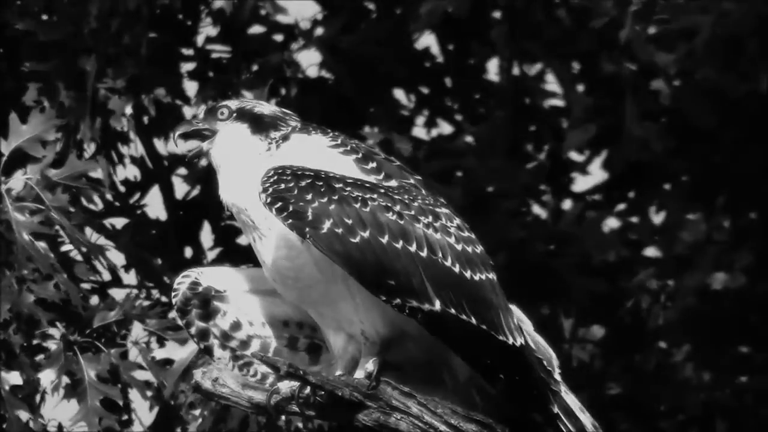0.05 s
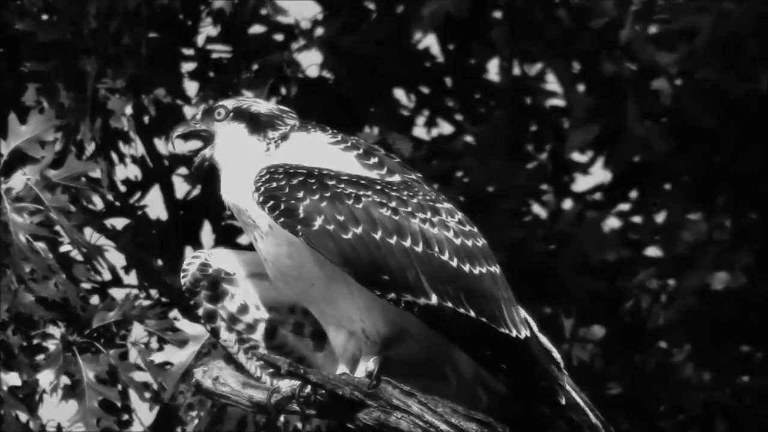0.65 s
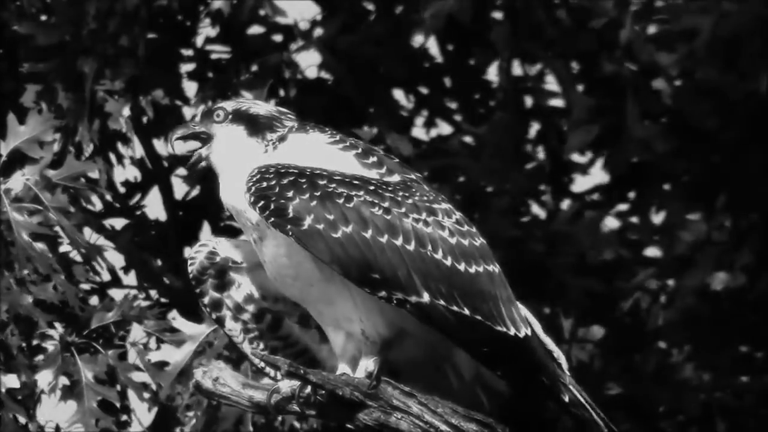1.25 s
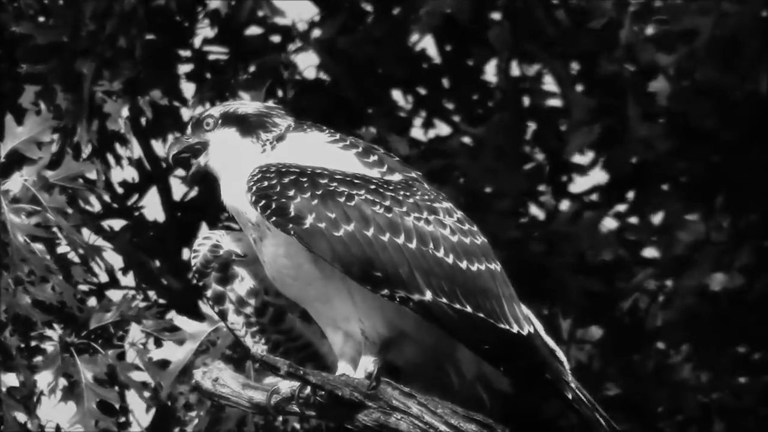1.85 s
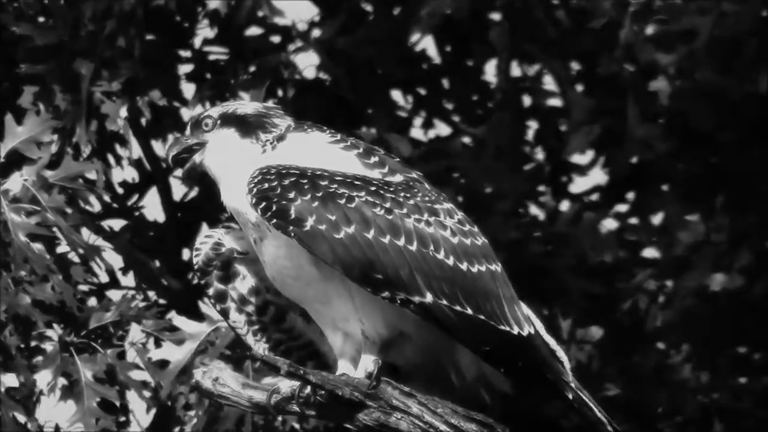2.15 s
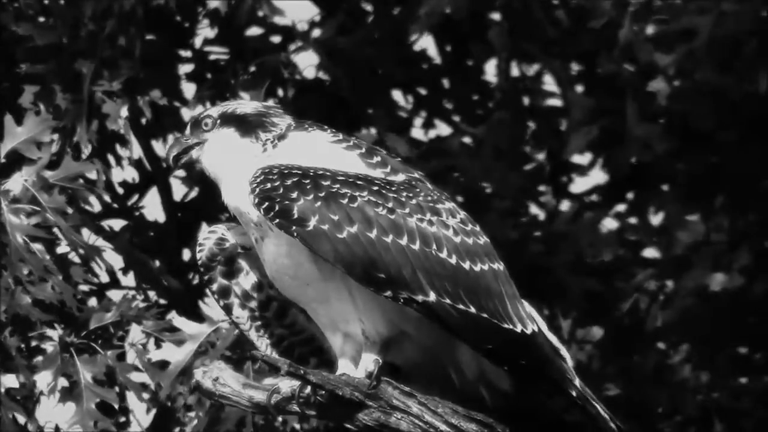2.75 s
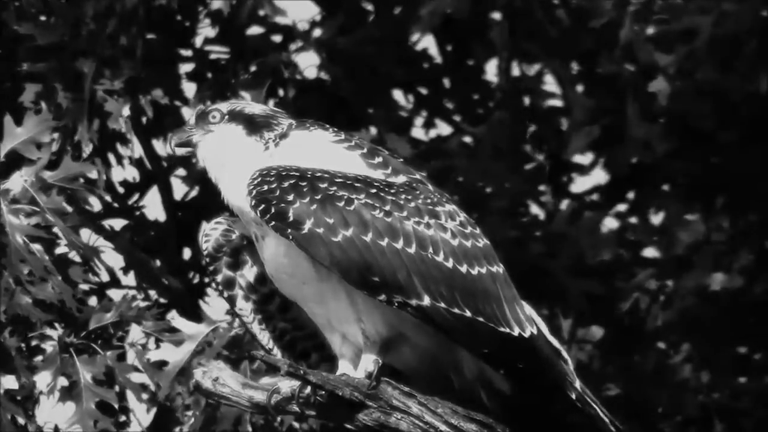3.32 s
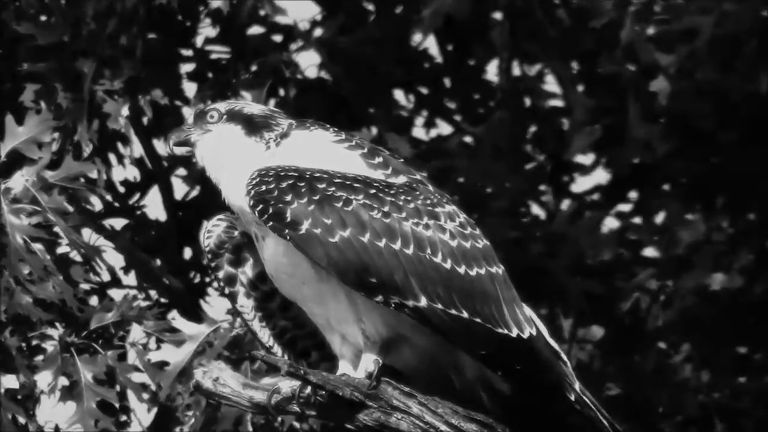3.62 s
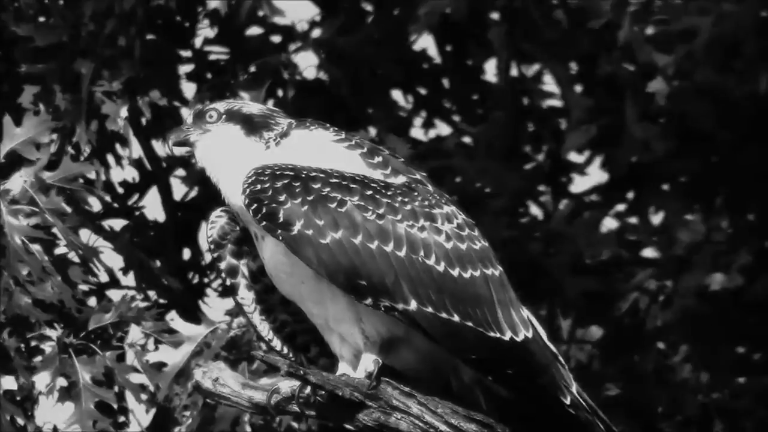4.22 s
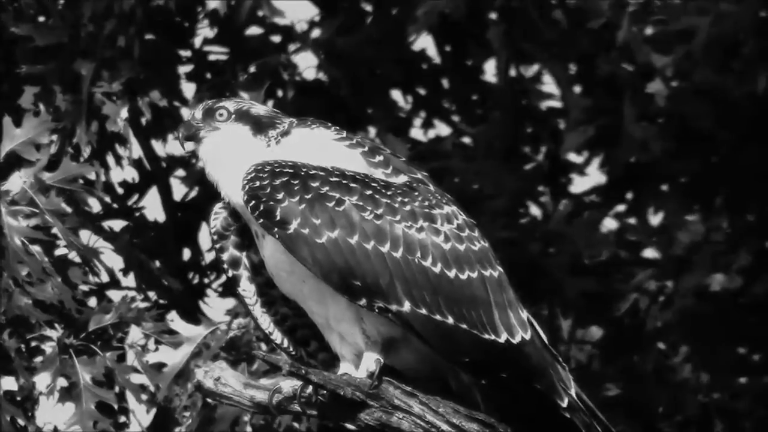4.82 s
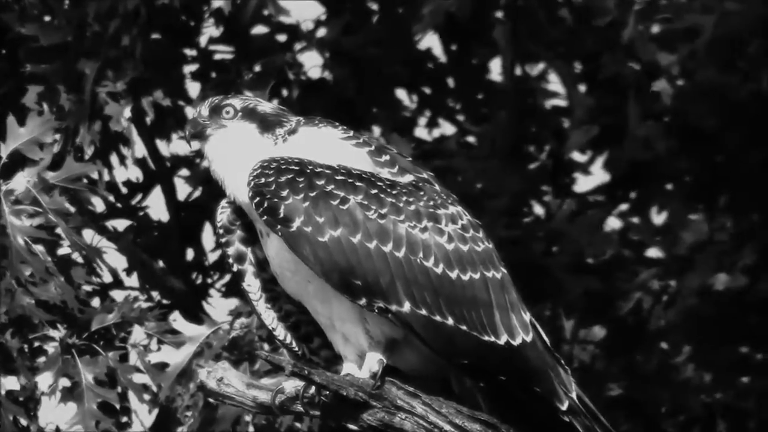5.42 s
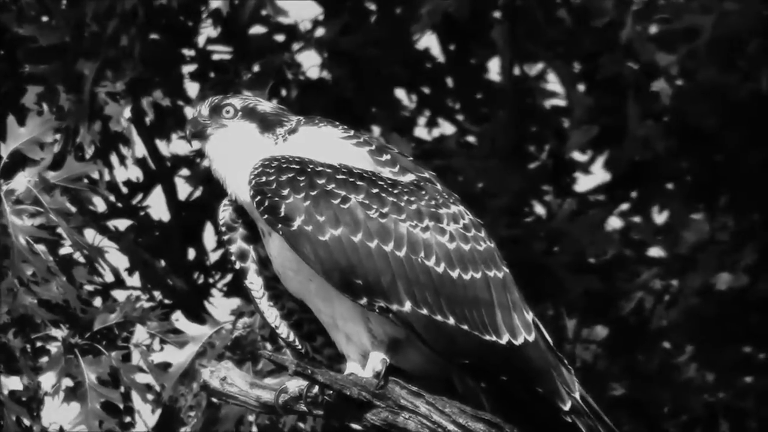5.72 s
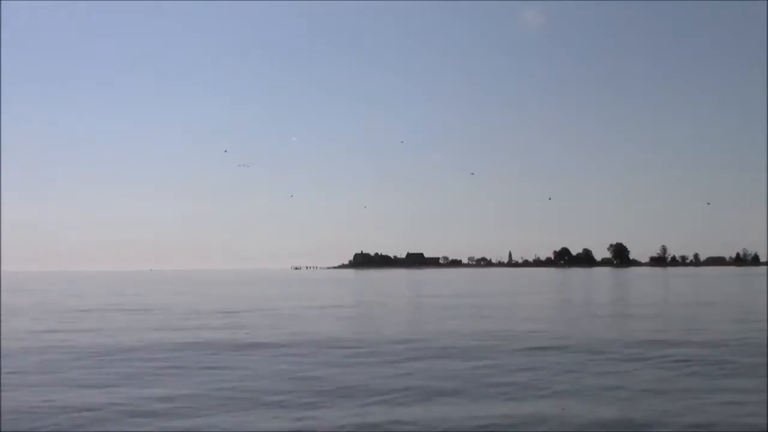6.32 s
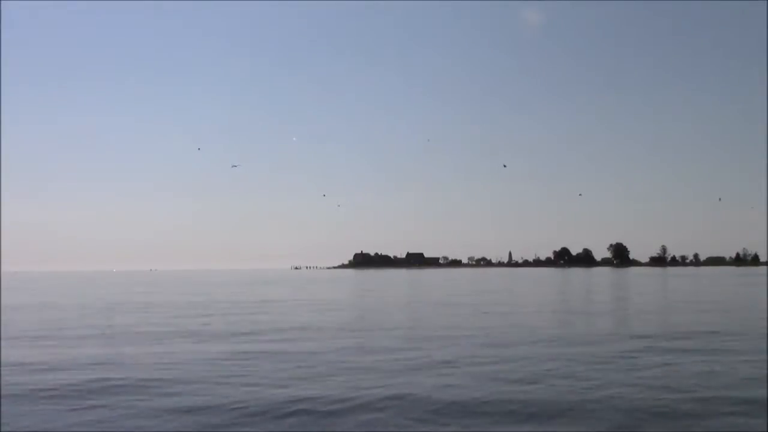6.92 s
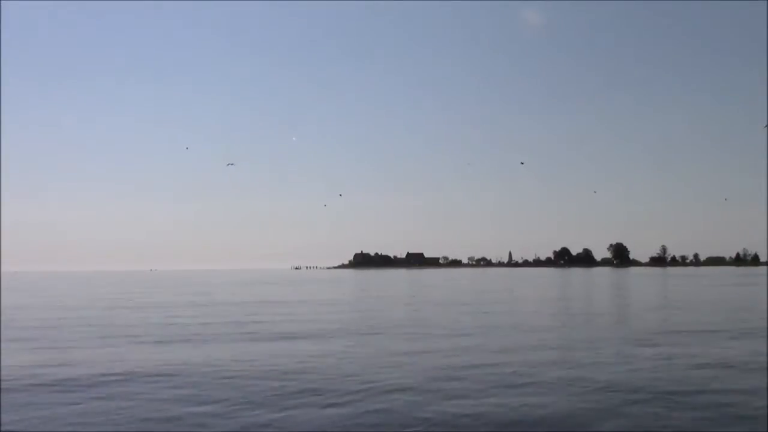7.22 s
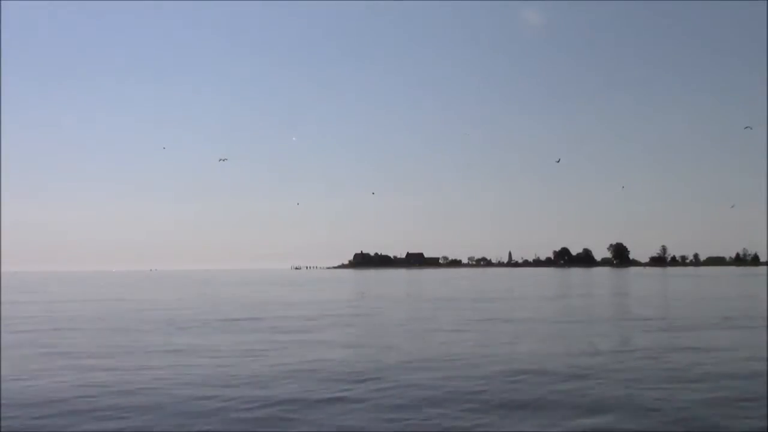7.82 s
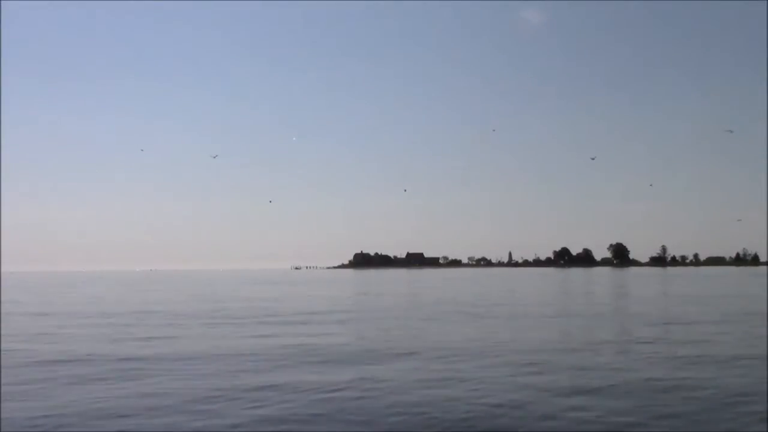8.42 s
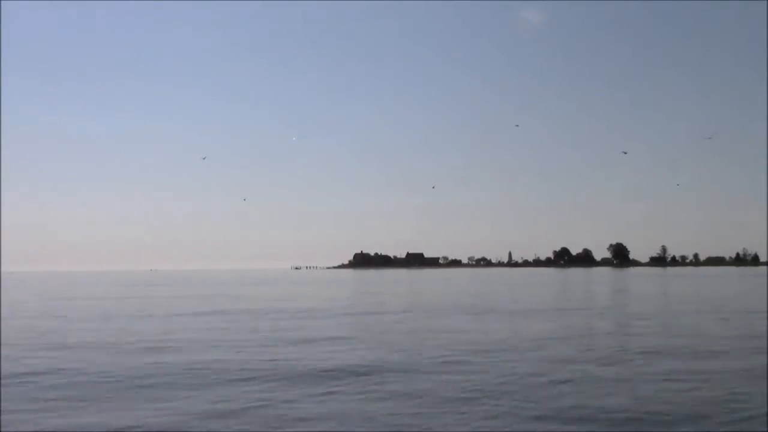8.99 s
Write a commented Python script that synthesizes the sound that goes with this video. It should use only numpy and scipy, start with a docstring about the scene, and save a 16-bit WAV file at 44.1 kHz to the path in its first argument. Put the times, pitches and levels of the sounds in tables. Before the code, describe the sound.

A bird of prey calls near the microphone in a quick string of piercing, slightly raspy whistles, while a camera fires two rapid bursts of shutter clicks. When the calls stop, only thin insect buzz, rustling leaves and small dry ticks remain. A sharp knock then cuts from the woods to a quiet shore, where little waves lap and plop, a distant bird whistles twice and a boat engine hums very faintly.

```python
"""Osprey, camera shutter and open water

An osprey gives a run of arched whistles, a clear voice and a cracked one sharing its syrinx, while
a camera shutter clatters through two bursts. Insects buzz, leaves stir and twigs tick. On a knock
at six seconds the wood gives way to calm open water: small waves slap, bubbles ring as they form,
a far boat drones and a far bird whistles."""
import sys
import numpy as np
from scipy import signal
from scipy.fft import rfft, irfft
from scipy.io import wavfile

SR = 44100
rng = np.random.default_rng(int(sys.argv[2]) if len(sys.argv) > 2 else 0)


def output_pcm(signal):
    """Save a mono or channel-first signal as 16-bit PCM at the path in sys.argv[1].

    Samples are clipped to [-1, 1] before scaling.
    """
    pcm = np.clip(np.atleast_2d(signal).T, -1, 1) * 32767
    wavfile.write(sys.argv[1], SR, np.round(pcm).astype(np.int16))


N = 403515
TIME = np.arange(N) / SR
FREQS = np.maximum(np.arange(N // 2 + 1) * SR / N, 1)
WATER_FROM_S = 6.015

# The osprey's calls. Each row: start and end in seconds, crest pitch in Hz, level in dB, then in dB
# against that level: octave, low voice at the ends, low voice held, rattle, half-order tones.
OSPREY_CALLS = [(-0.035, 0.047, 3215, -26, -14, -6.5, -21, -18.5, -43),
                (0.174, 0.367, 3199, -26.5, -14, -8, -21.5, -20.5, -43),
                (0.503, 0.584, 3164, -30, -8.5, -2.5, -18.5, -19, -36),
                (0.691, 0.859, 3177, -26.5, -9, -11.5, -20.5, -22.5, -38),
                (0.987, 1.067, 3162, -27.5, -6.5, -6.5, -21, -28, -31),
                (1.174, 1.33, 3202, -24, -10.5, -10, -22, -30, -45),
                (1.463, 1.539, 3137, -30.5, -6, -3, -25.5, -20.5, -32),
                (1.663, 1.744, 3117, -30, -11.5, -9.5, -26, -23, -25.5),
                (1.857, 1.946, 3128, -28.5, -9, -11, -25, -23, -30),
                (2.041, 2.179, 3164, -25.5, -10, -10, -23, -33, -40),
                (2.284, 2.365, 3139, -26.5, -10, -6.5, -28, -29, -29),
                (2.482, 2.562, 3048, -30, -6, -16, -28, -24, -30),
                (2.66, 2.75, 3073, -28.5, -11.5, -6.5, -24, -26, -29),
                (2.895, 2.984, 2988, -33, -6, -20, -27, -20, -32)]
# Lower calls droop further at both ends. Each row: crest pitch in Hz, droop in Hz.
CALL_DROOP = [(3110, 220), (3200, 100.4)]
# Air rushing through the throat. Each row: frequency in Hz, relative level in dB.
THROAT_AIR = [(1500, -25.5), (2200, -4), (2600, 2.5), (3000, 5), (3500, -5.5), (4100, -6.5), (4700, -14),
              (5600, -15), (6500, -6.5), (7900, -8), (9500, -24), (13000, -29.5), (16000, -53)]
# Echoes off trunk and canopy. Each row: delay in seconds, level in dB, left over right in dB.
TREE_ECHOES = [(.0052, -19, 4), (0.019, -14.5, 6), (.036, -13, -4.5), (.071, -23, -2), (.098, -20, -4)]
# The insect chorus. Each row: pitch in Hz, bandwidth in Hz, pulses per second, fall within a pulse
# in Hz, level in dB, stop time in seconds.
INSECT_VOICES = [(6868, 120, 43, 200, -57, 6.01), (6430, 440, 36, 320, -58, 6.01),
                 (5290, 480, 36, 340, -63.5, 6.01), (7410, 220, 32, 160, -69.5, 6.01),
                 (5140, 260, 61, 550, -53.5, 0.595)]
# The far murmur of the wood. Each row: frequency in Hz, relative level in dB.
WOOD_MURMUR = [(18, -48), (30, -18.5), (97, -20), (135, -8), (434, -5), (632, -5.5), (864, -3.5),
               (1040, -3.5), (1280, -4.5), (2610, -14.5), (4400, -27), (5720, -25), (8000, -26),
               (10500, -22.5), (16000, -36.5)]
# The colour of rustling leaves. Each row: frequency in Hz, relative level in dB.
LEAF_RUSTLE = [(250, -32), (550, 4), (1500, -3), (3000, 0), (5000, -3), (9000, -12), (12000, -24),
               (16000, -25.5)]
# The breeze in the leaves. Each row: time in seconds, level of their treble in dB.
BREEZE_LEVEL = [(3.3, -81), (3.58, -84), (4.56, -75.5), (5.18, -77), (5.65, -73), (6.0, -82.5)]
# Stereo width of the noise beds. Each row: frequency in Hz, left-right correlation.
EAR_LIKENESS = [(30, .1), (80, 0.18), (200, 0.42), (1000, 0.049), (3000, 0.2), (7000, 0.11), (14000, 0.11)]
# Shutter bursts. Each row: start in seconds, number of frames.
SHUTTER_BURSTS = [(.5923, 3), (2.6047, 4)]
# Mirror and blades landing in one release. Each row: delay in seconds, snap in dB, snap decay in
# seconds, frame ring in dB, body thud in dB.
SHUTTER_CONTACTS = [(.0015, -33.5, 0.0024, -31, -52), (0.0129, -25.5, 0.0022, -32, -33),
                    (0.0226, -32.5, 0.006, -43, -67), (0.026, -52, 0.0024, -30, -29),
                    (0.0465, -25, 0.0034, -28, -30), (.0525, -43, 0.0023, -42, -33),
                    (.069, -36.5, 0.0058, -23.5, -37), (.083, -26.5, 0.0017, -44, -33.5),
                    (.087, -34, 0.0057, -49, -38.5), (.1, -50, 0.0013, -27, -42)]
# The snap of a contact. Each row: frequency in Hz, relative level in dB.
CONTACT_SNAP = [(250, -37), (500, 6), (900, -14), (1500, 4.5), (2500, 3), (4000, 0.5), (7000, 0),
                (8500, -5), (11000, -8.5), (13000, -23), (16000, -29)]
# The ring of the camera's frame. Each row: pitch in Hz, level in dB, seconds to fall 60 dB.
FRAME_RING = [(1363, -10.5, 0.032), (1623, -9, 0.017), (1794, -9.5, 0.036), (1960, -6.5, 0.012),
              (2150, -6, 0.018)]
# The thud of the camera's body. Each row: pitch in Hz, level in dB, seconds to fall 60 dB.
BODY_THUD = [(396, -9, 0.011), (510, -4.5, 0.055), (562, -8, 0.022), (671, -15, 0.064), (890, -18, 0.058),
             (1050, -16, 0.025)]
# The winding motor. Each row: frequency in Hz, relative level in dB.
MOTOR_WHIRR = [(300, -28), (520, -1.5), (900, -3.5), (1400, -4), (2100, 1.5), (2700, -12.5),
               (7000, -13), (12000, -25), (16000, -42)]
# Twig ticks and camera knocks. Each row: time in seconds, level in dB, pitch in Hz, treble trim in dB,
# decay in seconds.
DRY_TICKS = [(3.8786, -39.5, 2020, 0, 0.0022), (4.0274, -28.5, 2900, -30, 0.00085),
             (4.047, -42, 3300, -20, 0.00092), (4.272, -46, 2880, -35, .002),
             (4.3505, -33, 1620, -39, 0.0012), (4.4966, -23, 1880, -22, .0005),
             (4.4985, -32, 2030, -25, 0.00099), (4.5117, -23, 4340, -25, 0.00077),
             (4.6485, -42.5, 2780, -30, 0.0017), (4.7398, -35.5, 2680, -28, 0.00094),
             (4.7852, -42.5, 1700, -14, 0.0012), (5.2697, -38, 3680, -14, 0.0014),
             (5.726, -35, 5660, -1, 0.0015), (5.9305, -41.5, 2850, -5, 0.0025),
             (5.9395, -49, 2930, 7, 0.011), (6.005, -24, 2680, -24, 0.0022),
             (6.0082, -25, 3000, -25, 0.0027), (6.0105, -28, 1510, -32, 0.0024),
             (6.0148, -23.5, 2400, -14, .003), (6.019, -26.5, 2280, -30, 0.0023)]
# Where the ticks sit. Each row: time in seconds, bearing from -1 (right) to 1 (left).
TICK_PATH = [(3.9, 0), (4.35, .65), (4.52, .65), (4.7, 0), (5.95, 0), (6.0, -1)]
# The noise in a crack and in a tap. Each row: frequency in Hz, relative level in dB.
CRACK_SPLINTER = [(250, -35), (600, -12.5), (1500, -7), (4200, -3.5), (7000, -20), (16000, -50)]
CRACK_TREBLE = [(2500, -5), (8000, -3), (12000, -16), (16000, -30)]
TAP_SKIRT = [(200, -40), (500, -17), (1500, -1), (4500, -5), (7000, -58), (16000, -52)]
TAP_TREBLE = [(2500, -2), (5000, -3), (8000, -7), (12000, -23), (16000, -32)]
# Soft handling bumps. Each row: time in seconds, level in dB, pitch in Hz.
HANDLING_BUMPS = [(3.882, -40.5, 570), (4.496, -36.5, 575), (4.514, -49, 594), (4.765, -36.5, 444),
                  (4.783, -41, 496), (4.819, -37.5, 630), (5.369, -40, 730)]
# The wash of small waves. Each row: frequency in Hz, relative level in dB.
WAVE_WASH = [(18, -54), (30, -34), (96, -29), (164, -4.5), (291, -5), (357, -1.5), (476, -4), (916, -2.5),
             (1250, -9), (1560, -9), (4000, -24), (5200, -58), (8800, -120)]
# Their fine spray. Each row: frequency in Hz, relative level in dB.
WAVE_SPRAY = [(1500, -4), (3000, -0.5), (6000, -6), (8000, -8.5), (10500, -15), (13000, -19), (16000, -26)]
# The tones of the boat's engine. Each row: pitch in Hz, relative level in dB.
ENGINE_TONES = [(172.3, -81.5), (188.4, -83.5), (253.0, -73), (274.5, -76), (317.6, -71.5), (339.1, -67),
                (376.8, -73)]
# The swell of its drone. Each row: time in seconds, level in dB.
ENGINE_LEVEL = [(6.25, -70.5), (7.15, -65), (7.4, -59.5), (8.45, -59), (9.15, -66)]
# Bubbles ringing as they form, and near 8.86 s the three short rings of one wave slap. Each row: time in
# seconds, level in dB, pitch in Hz, decay in seconds, # rise in octaves per second.
BUBBLES_AND_SLAP = [(6.068, -44, 1480, 0.0056, 16), (7.679, -50, 1080, .008, -5), (7.693, -45, 1960, 0.0051, 70),
                    (7.729, -51, 1680, .005, 15), (7.741, -51, 1780, .005, 6), (7.763, -48, 1540, 0.0046, 18),
                    (7.771, -46, 1800, 0.0097, 4), (8.536, -51.5, 1570, 0.0072, 3), (8.618, -52, 1740, 0.0036, 13),
                    (8.732, -47, 1470, .005, 11), (8.743, -46.5, 713, 0.018, 5), (8.8576, -31.5, 1550, .0009, 0),
                    (8.8646, -31.5, 700, 0.0015, 0), (8.8695, -36.5, 714, 0.0025, 4),
                    (9.143, -47.5, 1750, 0.0069, 23)]
# Slaps of small waves. Each row: time in seconds, level in dB, pitch in Hz, treble in dB,
# decay in seconds.
WAVE_SLAPS = [(6.099, -42, 1900, -1, 0.0073), (6.523, -50, 2490, 3, 0.0097),
              (7.0425, -35.5, 1580, -14, 0.0022), (7.679, -40.5, 1090, -3, 0.0067),
              (7.709, -40, 1410, -6, 0.0075), (7.77, -45, 2020, -25, 0.0067),
              (7.926, -43.5, 825, -11, 0.0082), (8.073, -40, 890, 0, 0.0055),
              (8.083, -41.5, 1300, -2, 0.005), (8.26, -40, 1090, -9, 0.0047),
              (8.357, -47.5, 900, 8, 0.0057), (8.552, -45, 1740, -20, .004),
              (8.739, -45, 1910, -29, 0.0046), (8.8595, -36, 2720, -38, 0.0031),
              (9.098, -41, 786, -23, .005)]
# The gurgle of a gathering wavelet. Each row: frequency in Hz, relative level in dB.
WAVE_GURGLE = [(300, -21), (750, 0), (1200, -5), (1500, 3), (2000, -13), (3600, -11), (5000, -26),
               (16000, -41)]
# The far bird's notes. Each row: start and end in seconds, first, middle and last pitch in Hz,
# level in dB, octave against that level in dB.
FAR_BIRD_NOTES = [(6.186, 6.211, 4250, 3200, 2670, -52, -30), (6.212, 6.26, 3210, 3210, 3300, -58.5, -20),
                  (6.288, 6.313, 3520, 3730, 2850, -54.5, -32),
                  (6.317, 6.531, 2680, 2535, 2620, -53.5, -5.5), (7.091, 7.104, 4480, 3930, 3200, -55, -32),
                  (7.1, 7.285, 3016, 3000, 2940, -43.5, -20.5), (7.284, 7.292, 4400, 4320, 4150, -57, -30)]
# The far bird's breath. Each row: frequency in Hz, relative level in dB.
FAR_BIRD_AIR = [(1500, -28), (2600, 2), (4200, -5), (6000, -11), (9000, -23), (16000, -45)]


def from_db(db):
    """Decibels to gain."""
    return 10 ** (np.asarray(db) / 20)


def rms_one(x):
    """Scale to unit rms."""
    return x / np.sqrt(np.mean(x ** 2) + 1e-20)


def curve(x, points):
    """Read a two-column table at x, in straight lines between its rows."""
    return np.interp(x, *np.transpose(points))


def over_hz(points):
    """A spectrum table at every frequency."""
    hz, value = np.transpose(sorted(points))
    return np.interp(np.log(FREQS), np.log(hz), value)


def noise(spectrum):
    """Coloured noise of rms 1."""
    return rms_one(irfft(rfft(rng.standard_normal(N)) * from_db(over_hz(spectrum)), N))


def wide_noise(spectrum):
    """Coloured stereo noise, partly alike in the two ears."""
    mid, side = rfft(rng.standard_normal((2, N))) * from_db(over_hz(spectrum))
    alike = over_hz(EAR_LIKENESS)
    return rms_one(irfft(np.sqrt(1 + alike) * mid + np.sqrt(1 - alike) * side * [[1], [-1]], N))


def drift(rate):
    """A random wobble of rms 1, with `rate` new values a second."""
    knots = rng.standard_normal(int(N / SR * rate) + 2)
    return rms_one(np.interp(TIME * rate, np.arange(len(knots)), knots))


def gate(t, start, end, edge):
    """1 between start and end, with ramps of length edge."""
    return np.clip((t - start) / edge, 0, 1) * np.clip((end - t) / edge, 0, 1)


def hump(t, centre, width):
    """A smooth rise to 1 and back."""
    return np.exp(-((t - centre) / width) ** 2)


def resonance(hz, centre, width):
    """Gain of one resonance, 1 on top."""
    return 1 / np.hypot(1, 2 * (hz - centre) / width)


def low_cut(x, hz, order):
    """Roll off the bass."""
    return signal.sosfilt(signal.butter(order, hz, "high", fs=SR, output="sos"), x)


def turns(hz):
    """Running phase of a pitch curve, in radians."""
    return 2 * np.pi * np.cumsum(hz) / SR


def pan(db):
    """Stereo gains, the left louder by db."""
    return from_db(np.array([[db], [-db]]) / 2)


def place(sound, bearing, side_db=5, lag_s=.00012):
    """A sound from the right (-1) or left (1) reaches the nearer ear sooner and louder."""
    lead = np.pi * np.arange(len(sound) // 2 + 1) * SR / len(sound) * lag_s * bearing
    timing = np.exp(1j * lead * np.array([[1], [-1]]))
    return irfft(rfft(sound) * pan(side_db * bearing) * timing, len(sound))


def add(out, s, sound):
    """Mix a sound in at time s."""
    at = int(round(s * SR))
    out[..., at:at + sound.shape[-1]] += sound[..., :N - at]


def scatter(start, end, per_s, db, hz, shared, spread_db=2.5, spread_octaves=.55):
    """Chance events. Each row: time in seconds, level in dB, pitch in Hz, then the shared values."""
    times = start + np.cumsum(rng.exponential(1, 60)) / per_s
    chance = np.clip(rng.standard_normal((60, 2)), -2, 2)
    return [(s, db + spread_db * size, hz * 2 ** (spread_octaves * pitch), *shared)
            for s, (size, pitch) in zip(times, chance) if s < end]


def call_arch(t, start, end, crest, slack, edge_s=.0441, swell_s=.061, fade_s=.018):
    """Pitch in Hz and swell in dB of one osprey call: both arch with the air pressure."""
    inside = np.minimum(t - start, end - t)
    droop = curve(crest, CALL_DROOP) * np.clip(1 - inside / edge_s, 0, None) ** 2
    scoop = 130 * np.exp(-np.maximum(t - start, 0) / .00586)
    rising = np.clip(1 - (t - start) / swell_s, 0, 1)
    falling = np.clip(1 - (end - t) / fade_s, 0, 1)
    swell_db = -11 * rising ** 2 - 9 * falling ** 2 - 95 * slack
    # the whistle dips briefly, then swells at a lower pitch just before it ends
    dip_at, dip_s = end - .013, .0033
    swell_db += 3.5 * hump(t, end - .0069, .0037) - 9 * hump(t, dip_at, dip_s)
    step_down = 55 * np.clip((t - dip_at) / dip_s, 0, 1)
    return crest - droop - scoop - step_down - 934 * slack, swell_db


def osprey(chirp_s=.0793, low_hz=2460, beak_hz=6320, throat_hz=4620, rasp_db=-24.5):
    """Two voices of the syrinx: a low cracked one opens and closes each call, a clear one between."""
    out, air = np.zeros(N), noise(THROAT_AIR)
    jitter, crack_hz, flutter = drift(500), 55 * drift(600), from_db(.35 * drift(90))
    breaking, holding = from_db(2.8 * drift(250)), from_db(3.9 * drift(70))
    shimmer = from_db(np.minimum(4 * drift(75), 2) + 1.5 * drift(350))
    wander_hz, rattle_hz = 60 * drift(30), 1086 + 50 * drift(45)
    rattling = from_db(np.minimum(6 * drift(130), 5) - 1)
    for start, end, crest, level_db, octave_db, ends_db, held_db, rattle_db, half_db in OSPREY_CALLS:
        length = end - start
        # the low voice lingers longer round a long call
        lead, lag = np.array([.015, .01576]) * (length / chirp_s) ** .35
        span = (TIME > start - lead) & (TIME < end + lag)
        t = TIME[span]
        # a call longer than a plain chirp slackens in the middle: flatter, softer and hoarse
        slack = max(length - chirp_s, 0) * hump(t, (start + end) / 2, .1246 * length)
        pitch, swell_db = call_arch(t, start, end, crest, slack)
        high = turns(pitch + (8 + 600 * slack) * jitter[span])
        # the octave flares where it crosses the resonance of the open beak
        flare = (.31 + resonance(2 * pitch, beak_hz, 240) ** 2) * gate(t, start + .004, end, .004)
        octave = from_db(octave_db) * shimmer[span] * flare / flare.max()
        whistle = np.sin(high) + octave * np.sin(2 * high)
        whistle += from_db(-36) * np.sin(3 * high) + from_db(-48) * np.sin(4 * high)
        # alternate cycles differ a little, which adds wavering half-order tones
        half = high / 2 + turns(crack_hz[span])
        whistle += from_db(half_db) * (np.sin(high + half) + np.sin(2 * high + half))
        # the membranes rattle at an unsteady rate, setting side tones round the whistle
        rattle = turns(rattle_hz[span] + crack_hz[span])
        side_tones = np.sin(high + rattle) + from_db(-12) * np.sin(high - rattle)
        side_tones += from_db(-13.5) * np.sin(2 * high + rattle)
        whistle += from_db(rattle_db) * rattling[span] * side_tones
        # the low voice climbs to meet the whistle; the throat passes its octave near one resonance
        inside = np.minimum(t - start, end - t)
        low_droop = 400 * np.clip(-inside / lag, 0, 1)
        low_pitch = low_hz - low_droop + 90 * hump(inside, 0, .00499) + wander_hz[span]
        low = turns(low_pitch + crack_hz[span] / 2)
        low_octave = from_db(-9) * resonance(2 * low_pitch, throat_hz, 560)
        cracked = np.sin(low) + low_octave * np.sin(2 * low) + from_db(-16) * np.sin(3 * low)
        # sounding together, the two voices make combination tones
        mixed = np.sin(low) + from_db(-10) * np.sin(high + low) + from_db(-8) * np.sin(2 * high - low)
        clear = gate(t, start - .002, end + .003, .00096)
        loud = clear * from_db(level_db + swell_db) * flutter[span]
        held = clear * from_db(level_db + held_db) * holding[span]
        fringe = gate(t, start - lead, end + lag, .016) * (1 - clear)
        ends = fringe * from_db(level_db + ends_db) * breaking[span]
        out[span] += np.sqrt(2) * (loud * whistle + ends * cracked + held * mixed)
        # the breath follows only part of the whistle's swell
        breath = clear * (from_db(rasp_db + level_db + .41 * swell_db) + from_db(-53))
        out[span] += air[span] * (breath + from_db(-17) * ends + from_db(-9) * held)
    return out


def tree_echoes(call, floor_hz=2500):
    """Slapback off trunk and canopy; leaves and thin branches reflect mostly treble."""
    reflected = low_cut(call, floor_hz, order=4)
    return sum(from_db(db) * pan(side_db) * np.interp(TIME - delay, TIME, reflected, left=0)
               for delay, db, side_db in TREE_ECHOES)


def forest(x, wet_db, t60):
    """Leaves and trunks scatter a thin tail, different in each ear."""
    t = TIME[:SR]
    tail = rng.standard_normal((2, SR)) * from_db(-60 * t / t60) * np.minimum(t / .0048, 1)
    tail /= np.sqrt(np.sum(tail ** 2, axis=1, keepdims=True))
    return x + from_db(wet_db) * signal.fftconvolve(np.atleast_2d(x), tail, axes=1)[:, :N]


def insects(throb=.3):
    """Each pulse of the buzz is a narrow rasp that swells and falls in pitch."""
    out, wander = np.zeros((2, N)), .1 * drift(3)
    for hz, width, rate, fall, db, until in INSECT_VOICES:
        stroke = (rate * TIME + wander + .5) % 1
        phase = turns(hz - fall * (stroke - .5))
        mid, side = [drift(2 * width) * np.sin(phase) + drift(2 * width) * np.cos(phase)
                     for _ in range(2)]
        swell = 1 - throb * np.cos(2 * np.pi * stroke)
        buzz = rms_one(swell * (mid + .4 * side * [[1], [-1]]))
        out += from_db(db) * gate(TIME, -1, until, .015) * buzz
    return out * pan(-.5)


def woodland(murmur_db=-59.5, leaves_over_treble_db=17.5):
    """A steady far murmur, leaves rustling with the breeze, and one brief brush of foliage."""
    murmur = from_db(murmur_db) * wide_noise(WOOD_MURMUR)
    breeze = from_db(curve(TIME, BREEZE_LEVEL) + leaves_over_treble_db)
    brush = from_db(-50) * hump(TIME, 4.499, .039)
    return murmur + (breeze + brush) * from_db(1.85 * drift(120)) * wide_noise(LEAF_RUSTLE)


def ring(modes, t):
    """Struck modes, each with a chance strength and sign of its own."""
    return sum(from_db(db + rng.normal(0, 2.2) - 60 * t / t60) * rng.choice([-1, 1])
               * np.sin(2 * np.pi * hz * t) for hz, db, t60 in modes)


def shutter(frame_s=.1651, motor_db=-45, attack_s=.00077):
    """Mirror and blades hit the same contacts on every release, over the winding motor's whirr."""
    out, hiss, t = np.zeros(N), noise(CONTACT_SNAP), TIME[:SR // 12]
    releases = [start + k * frame_s for start, count in SHUTTER_BURSTS for k in range(count)]
    for delay, snap_db, decay, ring_db, thud_db in SHUTTER_CONTACTS:
        snap_shape = from_db(snap_db) * np.exp(-t / decay) * np.minimum(t / .00068, 1)
        usual = ring(BODY_THUD, t)   # part of a contact's thud is alike each time
        for s in releases:
            frame = from_db(ring_db) * ring(FRAME_RING, t)
            thud = from_db(thud_db) * (.6 * usual + .8 * ring(BODY_THUD, t))
            snap = snap_shape * hiss[int((s + delay) * SR):][:len(t)]
            add(out, s + delay, (frame + thud) * np.minimum(t / attack_s, 1) + snap)
    winding = sum(gate(TIME, s - .004, s + .042, .011) + gate(TIME, s + .031, s + .1187, .013)
                  for s in releases)
    out += from_db(motor_db) * winding * noise(MOTOR_WHIRR) * from_db(2 * drift(500))
    return low_cut(out, 380, order=3)   # so small a body radiates no bass


def cracks(rows, splinter_db=-8, fizz_db=-6, attack_s=.00016):
    """Dry cracks: a short ring, with splintering noise that dies as fast."""
    out, t = np.zeros((2, N)), TIME[:SR // 20]
    splinter, treble = noise(CRACK_SPLINTER), noise(CRACK_TREBLE)
    for s, db, hz, treble_db, decay in rows:
        part = int(s * SR) + np.arange(len(t))
        burst = np.sin(2 * np.pi * hz * t) + from_db(splinter_db) * splinter[part]
        burst += from_db(fizz_db + treble_db) * treble[part]
        shape = np.minimum(t / attack_s, 1) * np.exp(-t / decay)
        add(out, s, place(from_db(db) * burst * shape, curve(s, TICK_PATH)))
    return low_cut(out, 330, order=2)


def taps(rows, width, skirt_db, trim_db, ring_db=-8, attack_s=.0001):
    """Bumps and slaps: a dying resonance with a broad skirt of noise and a little treble."""
    out, t = np.zeros(N), TIME[:SR // 10]
    skirt, treble, white = noise(TAP_SKIRT), noise(TAP_TREBLE), rng.standard_normal(N)
    for s, db, hz, treble_db, decay in rows:
        part = (int(s * SR) + np.arange(len(t))) % N
        band = signal.butter(1, [hz / (1 + width), hz * (1 + width)], "band", fs=SR, output="sos")
        soften = signal.butter(1, 4 * min(hz, 4000), fs=SR, output="sos")
        tone = rms_one(signal.sosfilt(soften, signal.sosfilt(band, white[part])))
        burst = tone + from_db(skirt_db) * skirt[part] + from_db(treble_db) * treble[part]
        burst += from_db(ring_db) * np.sqrt(2) * np.sin(2 * np.pi * hz * t)
        shape = np.minimum(t / attack_s, 1) * (np.exp(-t / decay) + .27 * np.exp(-t / .00024))
        add(out, s, from_db(db + trim_db) * burst * shape)
    return low_cut(out, 330, order=3)


def handling(twig_treble_db=-24, twig_decay_s=.0015, bump_treble_db=-21, bump_decay_s=.0073):
    """Sharp ticks of twigs and camera, a few faint ones by chance, and duller bumps."""
    twigs = scatter(4.7, WATER_FROM_S, per_s=4.5, db=-46, hz=2230, shared=(twig_treble_db, twig_decay_s))
    bumps = [(s, db, hz, bump_treble_db, bump_decay_s) for s, db, hz in HANDLING_BUMPS]
    return cracks(DRY_TICKS + twigs) + taps(bumps, width=.09, skirt_db=-9, trim_db=-7)


def waves(wash_db=-57, spray_db=-64, break_db=-66):
    """The wash and spray of small waves; one wavelet breaks with extra fizz."""
    wash = from_db(wash_db + 1.2 * drift(20)) * wide_noise(WAVE_WASH)
    fizz = from_db(spray_db) + from_db(break_db) * hump(TIME, 8.13, .11)
    return wash + fizz * from_db(2.15 * drift(40)) * wide_noise(WAVE_SPRAY)


def far_boat():
    """A distant engine drones, each tone wavering in pitch and level."""
    engine = sum(np.sin(turns(hz + 1.233 * drift(8))) * from_db(db + 2 * drift(1.734))
                 for hz, db in ENGINE_TONES)
    return from_db(curve(TIME, ENGINE_LEVEL)) * rms_one(engine)


def plops(rows, attack_s=.0011, churn_share=.07):
    """Bubbles swell and ring down, most gliding upward, while churning water shakes their pitch."""
    out, t, churn = np.zeros(N), TIME[:SR // 20], drift(900)
    for s, db, hz, decay, rise in rows:
        part = (int(s * SR) + np.arange(len(t))) % N
        pitch = hz * 2 ** (rise * np.minimum(t, decay)) * (1 + churn_share * churn[part])
        shape = (1 - np.exp(-t / attack_s)) * np.exp(-t / decay)
        add(out, s, from_db(db) * shape / shape.max() * np.sin(turns(pitch)))
    return out


def lapping(drop_decay_s=.003, drop_octaves_per_s=10):
    """Wavelets slap close by, with bubbles, chance droplets and one gathering gurgle."""
    drops = scatter(7.4, N / SR, per_s=22, db=-59, hz=1200, shared=(drop_decay_s, drop_octaves_per_s))
    gurgle = from_db(-49 + 2 * drift(150)) * hump(TIME, 8.859, .025) * noise(WAVE_GURGLE)
    slaps = taps(WAVE_SLAPS, width=.31, skirt_db=-8, trim_db=-6, ring_db=-12, attack_s=.0021)
    return slaps + plops(BUBBLES_AND_SLAP + drops) + gurgle


def far_bird(rasp_db=-17, drop_hz=85, side_hz=560, side_db=-18):
    """Thin, nearly level whistles with a little rasp, and slurred chips, over the water."""
    out, waver = np.zeros(N), 20 * drift(300) + 8 * drift(50)
    quaver = turns(side_hz + 130 * drift(300))
    air = noise(FAR_BIRD_AIR)
    for start, end, first, middle, last, db, octave_db in FAR_BIRD_NOTES:
        span = (TIME > start) & (TIME < end)
        t = TIME[span]
        progress = (t - start) / (end - start)
        slur = np.polyval(np.polyfit([0, .5, 1], [first, middle, last], 2), progress)
        phase = turns(slur - drop_hz * hump(t, end, .018) + waver[span])
        tone = np.sin(phase) + from_db(octave_db) * np.sin(2 * phase)
        # the voice frays into a breathy side tone as the note goes on
        tone += from_db(side_db) * progress * np.sin(phase + quaver[span])
        shape = from_db(db - 3 * hump(t, start, .017)) * gate(t, start, end, .0027)
        out[span] += shape * (np.sqrt(2) * tone + from_db(rasp_db) * air[span])
    return out * from_db(.5 * drift(60))


def scene():
    """Osprey and camera up front, over a woodland bed that cuts to open water."""
    call = osprey()
    bird = (forest(call, wet_db=-13.5, t60=.87) + tree_echoes(call)) * pan(.5)
    camera = forest(place(shutter(), bearing=-.072), wet_db=-15.5, t60=.19)
    ashore = gate(TIME, -1, WATER_FROM_S, .0081)
    wood = insects() + ashore * woodland()
    water = waves() + far_boat() + place(lapping(), bearing=-.38) + far_bird() * pan(-1.2)
    knocks = forest(handling(), wet_db=-9, t60=.03)
    return bird + camera + wood + knocks + (1 - ashore) * water


def record(dry):
    """A steep high cut takes the very top off the mix."""
    cutoff_hz = 15800
    return signal.sosfilt(signal.ellip(10, .1, 80, cutoff_hz, fs=SR, output="sos"), dry)


dry = scene()
out = record(dry)
output_pcm(out)
```